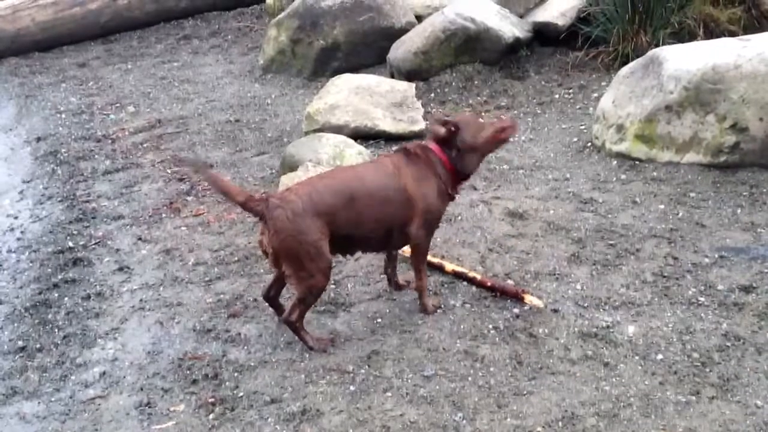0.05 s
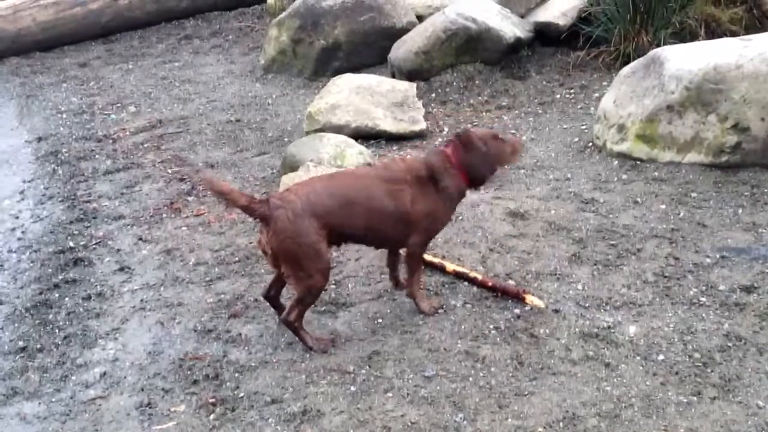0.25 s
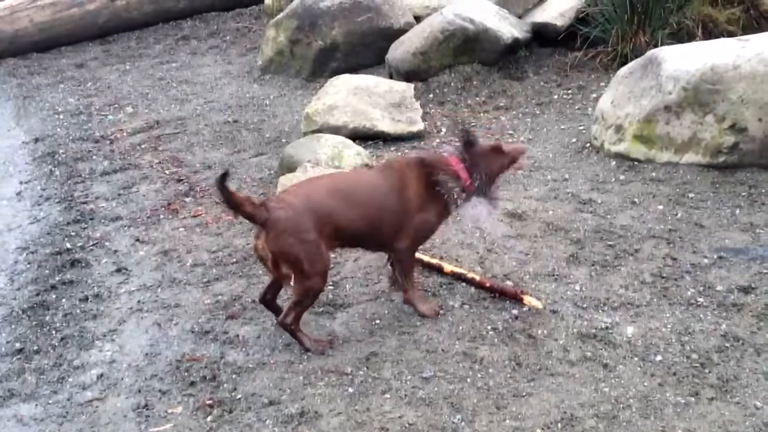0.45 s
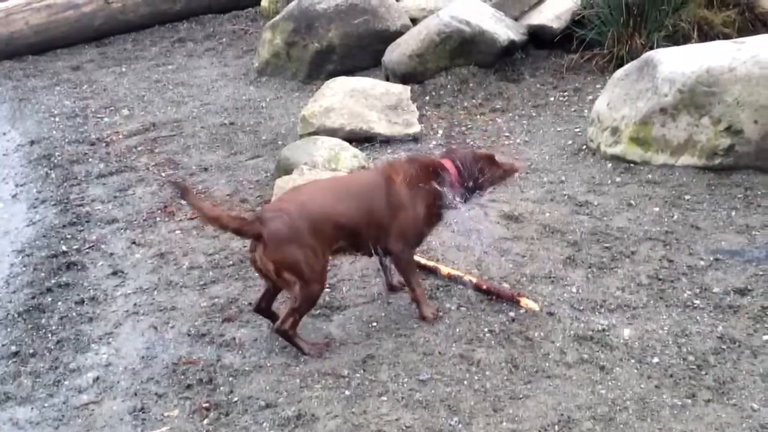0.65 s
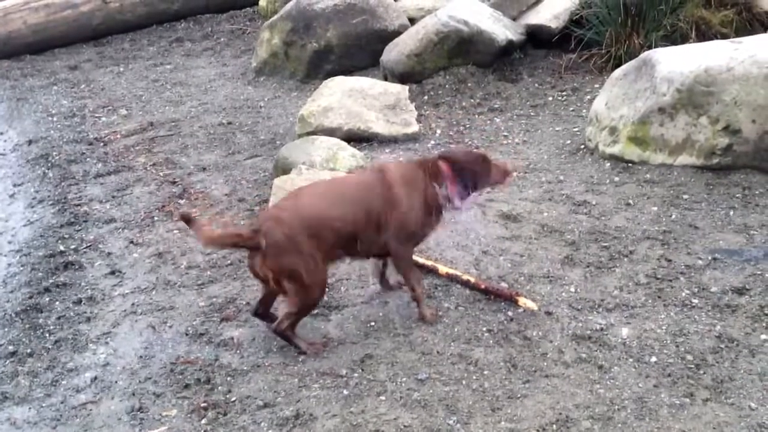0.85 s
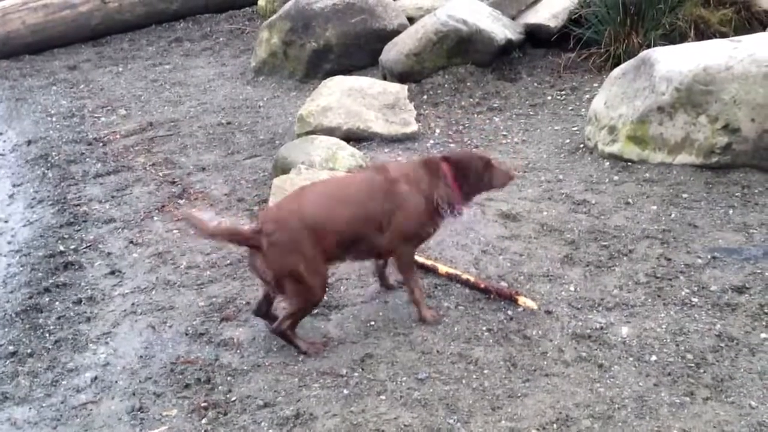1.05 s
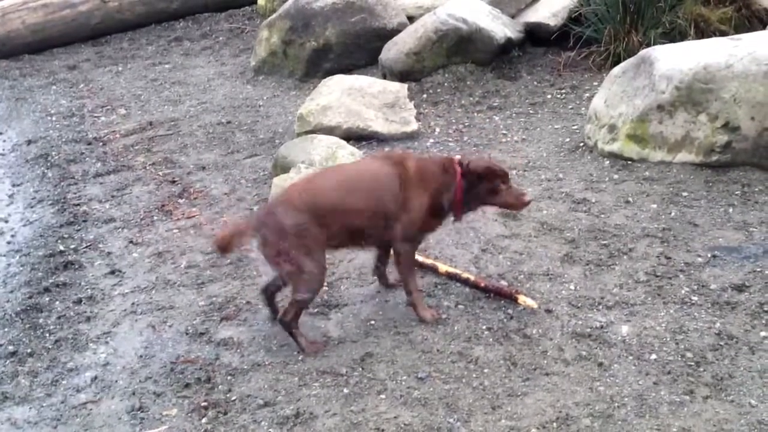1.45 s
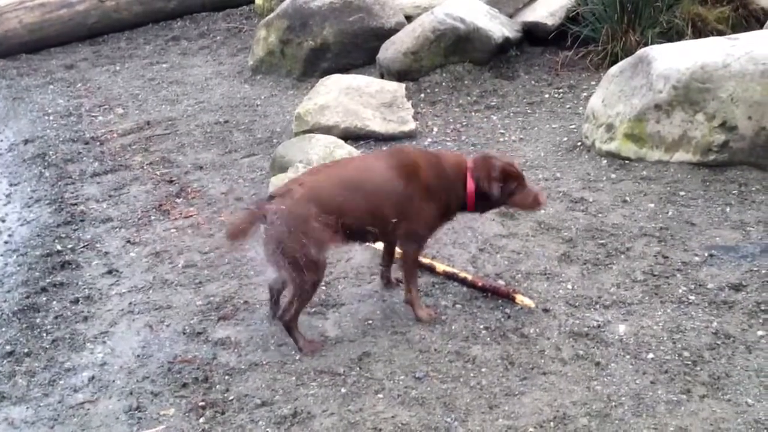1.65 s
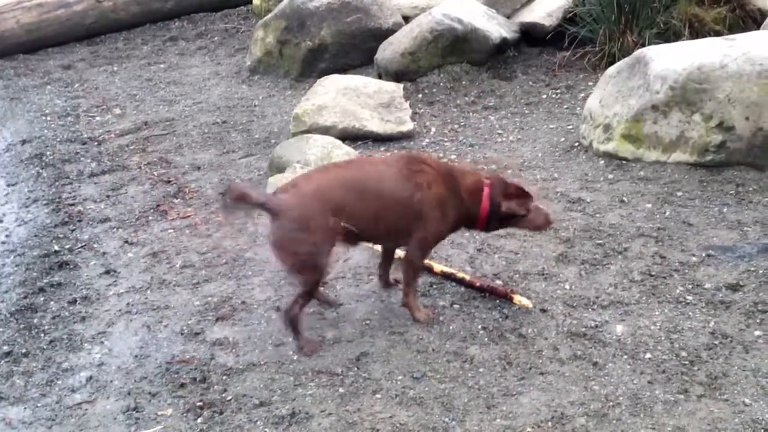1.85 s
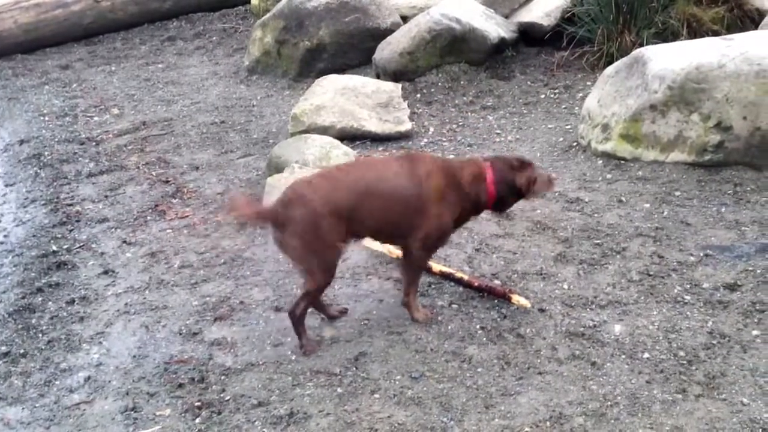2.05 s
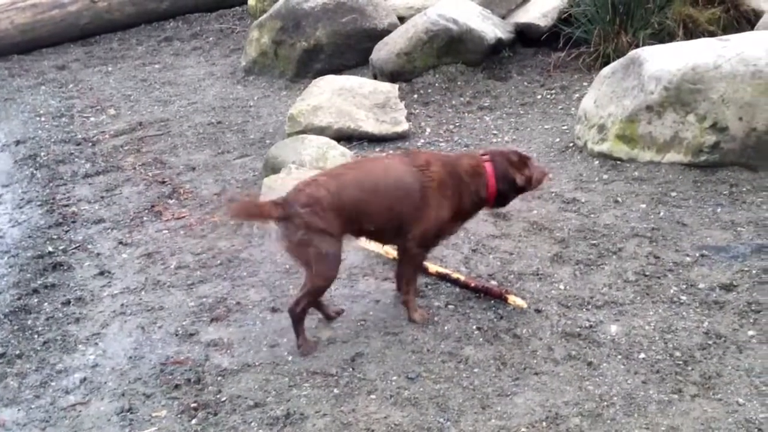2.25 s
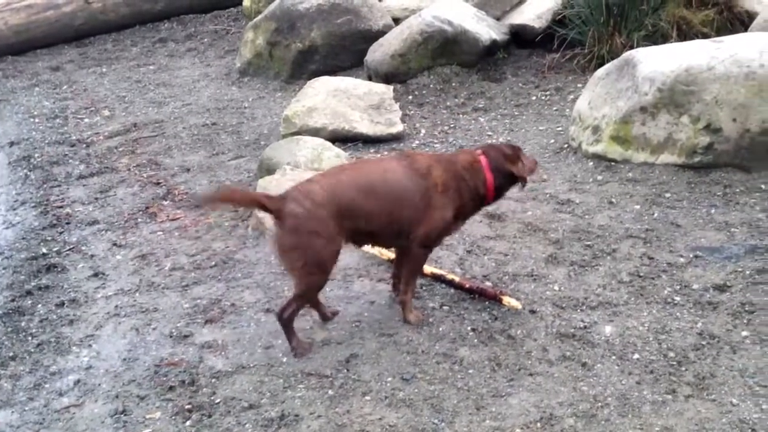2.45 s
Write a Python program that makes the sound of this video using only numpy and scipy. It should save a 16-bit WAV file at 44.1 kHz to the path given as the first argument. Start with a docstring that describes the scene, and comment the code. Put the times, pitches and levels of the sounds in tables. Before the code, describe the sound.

A dog shakes its wet coat on a gravel shore, with fast ear flaps, short splashes and jingling collar tags. The shake builds quickly and eases near the end, while a faint wash of water and air continues.

```python
"""A soft thud and a rising swish over the steady wash of a gravel lakeshore: a wet dog shakes itself.
Its ears slap its head, about nine times a second at full swing, each clap popping out a pocket of air.
Every turn flings a splash from the fur, wet folds squelch, and metal collar tags clack and ring.
Drops patter and hiss on the gravel, loose skin and paws thud, and the rocks scatter a faint echo."""
import sys
import numpy as np
from scipy import signal
from scipy.fft import rfft, irfft
from scipy.io import wavfile
from scipy.ndimage import uniform_filter1d

SR = 44100
rng = np.random.default_rng(int(sys.argv[2]) if len(sys.argv) > 2 else 0)


def store_wav(level_fs):
    """Save 16-bit WAV to argv[1]."""
    pcm = np.round(np.clip(np.atleast_2d(level_fs), -1, 1) * 32767)
    wavfile.write(sys.argv[1], SR, pcm.T.astype(np.int16))


N = 110250
T = np.arange(N) / SR

# tone of the bed of water and air: (frequency [Hz], level [dB])
SHORE_SPECTRUM = [(25, -32), (50, -29), (80, -11.5), (120, -7), (165, -0.5), (250, -2), (400, -5.5),
                  (800, 1), (1300, -5.5), (2500, -20), (6000, -27.5), (15500, -26.5)]
# soft thuds of loose skin and paws: (time [s], level [dB], decay [s])
BODY_THUDS = [(0, -46.5, 0.077), (0.126, -48.5, 0.036), (.25, -56, .025), (.53, -48.5, 0.021),
              (0.594, -34.5, 0.014), (0.679, -49.5, 0.013), (1.021, -44, .03), (1.151, -50, 0.027),
              (1.235, -59, 0.023), (1.304, -45, 0.014), (1.40, -52.5, 0.017), (1.499, -52, 0.027),
              (1.788, -49, 0.013), (2.119, -50.5, 0.031)]
# dull tone of a thud: (frequency [Hz], level [dB])
THUD_SPECTRUM = [(40, -25), (90, -24), (130, -0.5), (170, 5), (260, -4), (400, -15.5), (900, -57)]
# fader ride of the whirling coat: (time [s], level [dB])
COAT_ENVELOPE = [(0, -60.5), (.1, -54.5), (.2, -48.5), (.33, -48.5), (.42, -45.5), (.65, -46.5),
                 (.9, -47.5), (1.1, -47), (1.3, -50.5), (1.42, -49), (1.6, -49.5), (1.78, -51),
                 (1.93, -54.5), (2.0, -43.5), (2.15, -50), (2.32, -50), (2.42, -54), (2.5, -48.5)]
# tone of swishing wet hair: (frequency [Hz], level [dB])
SWISH_SPECTRUM = [(800, -13), (1500, 2.5), (2200, -1.5), (3500, 2), (6000, 1), (9500, -6.5), (12000, -6),
                  (15500, -11.5)]
# sheets of fine drops landing on the gravel: (time [s], level [dB], length [s])
SHOWER_SHEETS = [(0.73, -53, 0.039), (1.37, -40.5, 0.049), (1.389, -44.5, 0.061), (1.873, -38, 0.044),
                 (2.123, -45, 0.052)]
# bright hiss of fine drops, also the tick of a tag: (frequency [Hz], level [dB])
HISS_SPECTRUM = [(2000, -23), (4500, -5), (7000, -3), (10000, -3), (13000, -6.5), (15500, -21)]
# squelches of wet lips and coat: (time [s], level [dB], pitch [Hz], decay [s])
FOLD_SQUELCHES = [(0.125, -35, 3900, 0.0067), (0.499, -42, 2230, 0.0067), (.533, -43.5, 3450, 0.0037),
                  (0.552, -41.5, 1420, 0.0027), (.568, -47, 2200, 0.012), (0.602, -33.5, 2180, 0.0073),
                  (.780, -48, 2180, 0.012), (.828, -25.5, 2330, 0.0055), (0.902, -39, 1740, .004),
                  (0.92, -37, 1800, 0.0043), (1.006, -46, 3270, 0.0088), (1.199, -43, 1370, .004),
                  (1.220, -43, 2560, 0.0056), (1.254, -38, 2620, 0.021), (1.453, -26.5, 2700, 0.0063),
                  (1.700, -46, 2200, 0.0086), (2.006, -42.5, 1370, 0.0038), (2.198, -45, 1210, 0.0063),
                  (2.128, -41.5, 4300, .006), (2.418, -44.5, 2320, 0.0042)]
# a tag swings free and rings: (time [s], level [dB], ring time to -60 dB [s])
TAG_JINGLES = [(0.1546, -36, 0.075), (.164, -31, 0.073), (.2725, -31, 0.015), (.347, -36, 0.054),
               (0.8021, -30, 0.033), (.8125, -36, 0.036), (.9535, -23, .025), (1.0345, -20, .05),
               (1.339, -12.5, 0.021), (1.4035, -30.5, .03), (1.436, -35, .05), (1.504, -33.5, 0.067),
               (1.5713, -27, .05), (1.645, -38, 0.042), (1.668, -21.5, 0.013), (2.029, -21.5, 0.017),
               (2.059, -29, 0.063), (2.1247, -46, 0.18), (2.2283, -25.5, 0.057), (2.2335, -24, 0.077),
               (2.344, -35, 0.068), (2.467, -38, 0.14)]
# partials of a free tag: (frequency [Hz], level [dB])
FREE_TAG_MODES = [(5810, -21), (9225, -1), (9350, -10), (8730, -17), (13250, -26), (13480, -22)]
# the tags clash: (time [s], level [dB], tilt [dB/octave])
TAG_CLACKS = [(.2030, -20, 5.5), (0.4912, -14, 0), (0.4936, -4.5, -0.5), (.7337, -22.5, 11),
              (0.803, -24, 8), (.8120, -28, 10), (0.925, -34, -2), (0.9489, -12, -3), (0.9538, -12, -3),
              (1.3379, -21, 3), (1.3665, -30, 18), (1.5599, -17.5, -3.5), (2.0273, -24.5, -7),
              (2.057, -26.5, -5)]
# partials of tags damping each other: (frequency [Hz], level [dB], ring time to -60 dB [s])
CHOKED_TAG_MODES = [(3920, -11, 0.04), (5350, -13.5, 0.023), (5640, 1, 0.019), (5930, 2, 0.015),
                    (6900, -7, 0.0097), (7900, -5, 0.0082), (9050, 1, 0.031), (9150, -0.5, 0.0061),
                    (10700, -14, 0.022), (12960, -19.5, 0.034)]
# water bursts from the fur: (time [s], level [dB], rise [s], decay [s], tilt [dB/octave])
FUR_SPLASHES = [(0.124, -40, 0.0011, .010, 6), (0.246, -34, 0.0033, .006, 1.5),
                (0.361, -30, 0.0053, 0.013, -2), (0.552, -37, 0.0025, 0.0023, 10),
                (0.596, -25.5, 0.0088, 0.0076, 1), (0.694, -34, 0.0072, 0.0055, -0.5),
                (.729, -32.5, 0.0046, 0.017, 7.5), (0.811, -30, 0.0072, 0.013, -1),
                (.825, -26.5, 0.0054, 0.0075, 6), (0.944, -26.5, 0.0079, 0.0051, 9),
                (.998, -34, 0.00046, 0.0023, 2.5), (1.038, -26, 0.0081, .011, 1),
                (1.126, -30.5, 0.0023, 0.011, 0.5), (1.157, -36.5, 0.0046, 0.0097, 8.5),
                (1.199, -33, 0.0024, 0.002, 1.5), (1.219, -47.5, 0.0018, 0.018, 4),
                (1.245, -25.5, 0.0064, 0.014, 1), (1.3628, -23.5, .002, 0.0073, 7.5),
                (1.392, -43, 0.0027, 0.0056, -11), (1.44, -26.5, 0.01, 0.01, 1),
                (1.505, -42, 0.0023, 0.014, 2), (1.557, -29, 0.0068, 0.0038, 4),
                (1.653, -29.5, .008, 0.013, 1.5), (1.859, -31, 0.0014, 0.0098, 2),
                (1.877, -30, 0.0087, 0.0086, 8.5), (1.793, -45.5, 0.0022, 0.011, 12),
                (1.956, -42.5, 0.0017, 0.0094, 7), (2.023, -33.5, 0.0033, 0.0096, -1),
                (2.417, -43, .002, .010, 6)]
# tone of flung water: (frequency [Hz], level [dB])
SPLASH_SPECTRUM = [(300, -29), (1200, -15.5), (1650, -8), (2200, 2.5), (3200, -7.5), (4500, -5.5),
                   (7000, -10.5), (10000, -16.5), (15500, -31)]
# an ear claps against the head: (time [s], level [dB], pitch [Hz], overtone re pitch [dB])
EAR_SLAPS = [(.250, -69, 2280, -11), (0.3602, -18.5, 2320, -12), (0.4608, -17.5, 1910, -9),
             (0.469, -27.5, 2430, -15), (0.6985, -26.5, 1830, -18), (0.7066, -20.5, 1900, -6),
             (.8276, -15.5, 2226, -29), (1.0445, -19, 2088, -21), (1.1303, -21.5, 2004, -33),
             (1.1392, -23, 2020, -24), (1.2518, -15.5, 2313, -11), (1.3326, -17.5, 2070, -15),
             (1.4485, -19.5, 2283, -7.5), (1.518, -19.5, 2176, -20), (1.6596, -25, 2024, 6),
             (1.6702, -39.5, 2100, 16), (1.8594, -15, 2370, 2.5), (1.8813, -23.5, 2420, -0.5),
             (2.0168, -28, 2110, -4.5), (2.0279, -23, 2350, -9)]

SPRAY_GRAINS_PER_S = 5000


def from_db(db):
    """Decibels to gain."""
    return 10 ** (np.asarray(db) / 20)


def rms_one(x):
    """Scale to an rms of 1."""
    return x / np.sqrt(np.mean(x ** 2) + 1e-20)


def colour(x, spectrum, tilt_db=0):
    """EQ a sound to a spectrum, tilted per octave and rolled off below its first point; rms 1."""
    hz, db = np.transpose(spectrum)
    f = np.maximum(np.fft.rfftfreq(len(x), 1 / SR), 1)
    gain = from_db(np.interp(np.log(f), np.log(hz), db) + tilt_db * np.log2(np.clip(f, hz[0], hz[-1])))
    return rms_one(irfft(rfft(x) * gain * np.minimum(f / hz[0], 1) ** 2, len(x)))


def noise(spectrum, length=N, tilt_db=0):
    """Coloured noise; rms 1."""
    return colour(rng.standard_normal(length), spectrum, tilt_db)


def low_cut(x, hz):
    """Roll off the lows."""
    return signal.sosfilt(signal.butter(2, hz, "high", fs=SR, output="sos"), x)


def burst(start, rise, decay):
    """Envelope with a straight attack and an exponential fall."""
    age = T - start
    return np.clip(age / rise, 0, 1) * np.exp(-np.maximum(age - rise, 0) / decay)


def grains(per_s, spread_db):
    """Random clicks of uneven size and either sign."""
    hits = rng.random(N) < per_s / SR
    sizes = from_db(spread_db * np.minimum(rng.exponential(1, N), 4))
    return hits * sizes * rng.choice([-1, 1], N)


def add(out, start, sound):
    """Mix a short sound in at a time."""
    i = max(int(start * SR), 0)
    out[i:i + len(sound)] += sound[:max(N - i, 0)]


def ring(t, hz, t60):
    """One dying partial at a random phase."""
    return np.sin(2 * np.pi * (hz * t + rng.random())) * np.exp(-np.log(1000) * t / t60)


def shore():
    """The bed: a steady wash of water and air, wavering a little."""
    waver_db = 0.32 * rms_one(uniform_filter1d(rng.standard_normal(N), size=6000))
    return from_db(-52.5 + waver_db) * noise(SHORE_SPECTRUM)


def rock_scatter(x, t60=0.067):
    """Gravel and boulders throw back a faint, short echo."""
    scatter = noise(SWISH_SPECTRUM, tilt_db=-1.5) * burst(0.0025, rise=0.0074, decay=t60 / np.log(1000))
    return from_db(-21.5) * signal.fftconvolve(x, scatter / np.sqrt(np.sum(scatter ** 2)))[:N]


def body_thuds(rise_s=0.0077):
    """Dull thuds as the dog's weight is thrown about."""
    return noise(THUD_SPECTRUM) * sum(from_db(db) * burst(s, rise_s, decay) for s, db, decay in BODY_THUDS)


def drop_patter(per_s=420, low_hz=1876, high_hz=12300, cycles=17):
    """Flung drops hit the gravel, each a tiny ping that dies within a set number of cycles."""
    out, pitches = np.zeros(N), np.geomspace(low_hz, high_hz, 20)
    for hz in pitches:
        impacts = grains(per_s / len(pitches), spread_db=3.5)
        out += signal.fftconvolve(impacts, ring(T[:512], hz, t60=cycles / hz))[:N]
    return rms_one(low_cut(out, low_hz / 2))


def hair_crackle(per_s=89, decay_s=0.0013):
    """Wet hair crackles in tiny, bright ticks of noise."""
    power = signal.fftconvolve(grains(per_s, spread_db=2.2) ** 2, np.exp(-2 * T[:512] / decay_s))[:N]
    return colour(np.sqrt(np.abs(power)) * rng.standard_normal(N), SWISH_SPECTRUM, tilt_db=2.8)


def coat():
    """The whirling coat sheds drops, crackles and swishes, all riding the vigour of the shake."""
    texture = from_db(-8.5) * drop_patter() + from_db(-7) * hair_crackle()
    swish = from_db(-5.5) * noise(SWISH_SPECTRUM)
    vigour = from_db(np.interp(T, *np.transpose(COAT_ENVELOPE)))
    return vigour * (swish + texture)


def showers():
    """Each sheet of fine drops swells and fades in a hiss as it lands."""
    hiss = colour(grains(SPRAY_GRAINS_PER_S, spread_db=4.5), HISS_SPECTRUM)
    envelope = np.zeros(N)
    for s, db, length in SHOWER_SHEETS:
        progress = np.clip((T - s) / length, 0, 1)
        envelope += from_db(db) * np.sqrt(np.abs(np.sin(np.pi * progress)))
    return hiss * envelope


def squelches(rise_s=0.0037, relative_width=0.22):
    """Wet folds open and close, each briefly sounding one hollow resonance."""
    out, edge = np.zeros(N), 1 + relative_width / 2
    for s, db, hz, decay in FOLD_SQUELCHES:
        band = signal.butter(1, [hz / edge, hz * edge], "band", fs=SR, output="sos")
        hollow = signal.sosfilt(band, signal.sosfilt(band, rng.standard_normal(N)))
        out += from_db(db) * rms_one(hollow) * burst(s, rise_s, decay)
    return out


def tag_rattle(start_s=0.081, rise_db_per_s=2.5):
    """Light touches keep the tags shimmering, louder as the head slows and they hang freer."""
    touches = grains(per_s=150, spread_db=3.0) * (T > start_s) * from_db(rise_db_per_s * T)
    metal = sum(from_db(level) * ring(T[:8192], hz, t60=0.041) for hz, level in FREE_TAG_MODES)
    return from_db(-58) * rms_one(signal.fftconvolve(touches, metal)[:N])


def tag_jingles(detune=0.0035, tick_s=0.0018):
    """A tick of contact sets a free-hanging tag ringing thinly."""
    out, t = np.zeros(N), T[:8192]
    for s, db, t60 in TAG_JINGLES:
        metal = sum(from_db(level) * ring(t, hz * (1 + rng.normal(0, detune)), t60)
                    for hz, level in FREE_TAG_MODES)
        attack = np.minimum(t / (0.015 * t60), 1)   # longer rings open more softly
        tick = from_db(-12) * noise(HISS_SPECTRUM, len(t)) * np.exp(-t / tick_s)
        add(out, s, from_db(db) * (metal * attack + tick))
    return out


def tag_clacks(detune=0.0055, pivot_hz=7000, tick_s=0.00066, chatter_s=0.0077):
    """Metal tags clash and choke each other: a hard tick, a brief chatter and a damped ring."""
    out, t = np.zeros(N), T[:8192]
    contact = from_db(-5.5) * np.exp(-t / tick_s) + from_db(-20.5) * np.exp(-t / chatter_s)
    for s, db, tilt in TAG_CLACKS:
        modes = [(hz, level + tilt * np.log2(hz / pivot_hz), t60) for hz, level, t60 in CHOKED_TAG_MODES]
        metal = sum(from_db(level + rng.normal(0, 1.0)) * ring(t, hz * (1 + rng.normal(0, detune)), t60)
                    for hz, level, t60 in modes)
        clash = noise([(hz, level) for hz, level, _ in modes], len(t)) * contact
        add(out, s, from_db(db) * (from_db(-13.5) * metal + clash))
    return out


def splashes():
    """Dense droplets and fine mist leave the fur at each turn of the shake."""
    droplets = rms_one(grains(SPRAY_GRAINS_PER_S, spread_db=1.5))
    mist = 0.3 * rng.standard_normal(N)
    return sum(from_db(db) * burst(s, rise, decay) * colour(droplets + mist, SPLASH_SPECTRUM, tilt)
               for s, db, rise, decay, tilt in FUR_SPLASHES)


def ear_slaps(rise_s=0.0016, tail_s=0.0042, overtone_ratio=1.512):
    """An ear squeezes out a pocket of air: a pop of a few cycles, a wet crack on top, a short tail."""
    out, t = np.zeros(N), T[:4096]
    age = t / rise_s
    swell = (age * np.exp(1 - age)) ** 3.5   # a narrow pulse peaking at rise_s
    tail = from_db(-21.5) * np.minimum(age, 1) * np.exp(-t / tail_s)
    for s, db, hz, overtone_db in EAR_SLAPS:
        overtone = from_db(overtone_db) * np.sin(2 * np.pi * (overtone_ratio * hz * t + rng.random()))
        pop = np.sin(2 * np.pi * hz * t) + overtone
        wet = noise(SPLASH_SPECTRUM, len(t))
        add(out, s - rise_s, from_db(db) * (swell * (pop + from_db(-18) * wet) + tail * wet))
    return out


def scene():
    """The mono mix: the dog and its echo off the rocks, over the shore bed."""
    water = low_cut(ear_slaps() + splashes() + showers() + squelches(), hz=250)
    tags = low_cut(tag_clacks() + tag_jingles() + tag_rattle(), hz=2180)
    dog = water + tags + coat() + low_cut(body_thuds(), hz=83)
    return (dog + rock_scatter(dog) + shore())[None]


def record(dry):
    """A steep high cut takes off the very top."""
    cutoff_hz = 15500
    return signal.sosfilt(signal.ellip(10, .2, 70, cutoff_hz, fs=SR, output="sos"), dry)


dry = scene()
out = record(dry)
store_wav(out)
```